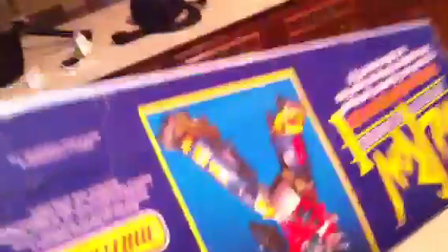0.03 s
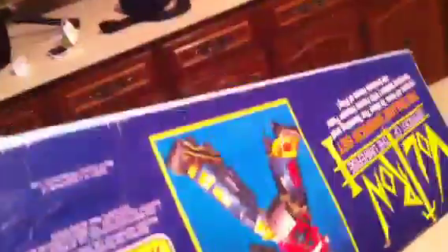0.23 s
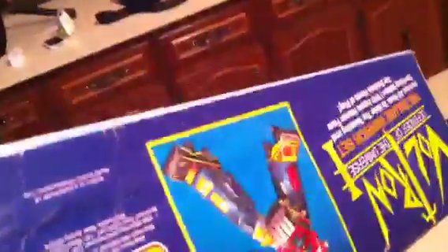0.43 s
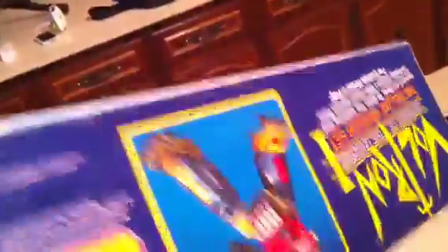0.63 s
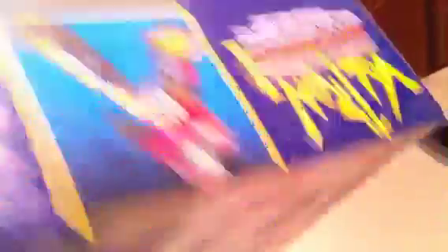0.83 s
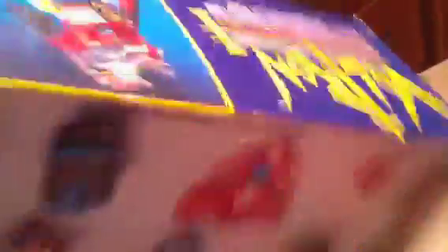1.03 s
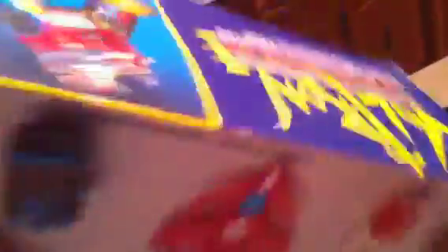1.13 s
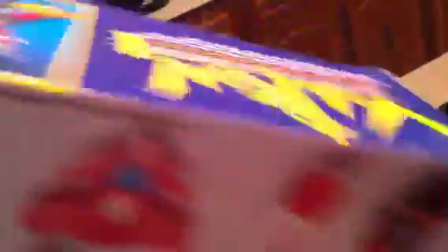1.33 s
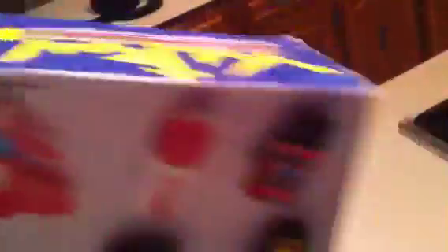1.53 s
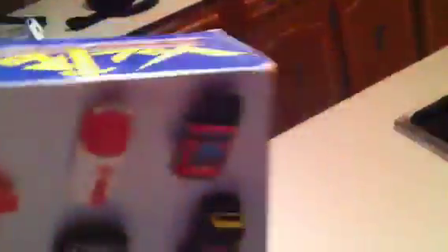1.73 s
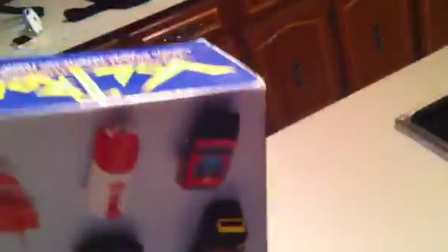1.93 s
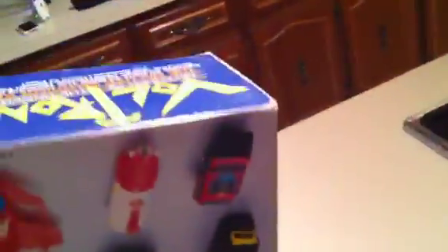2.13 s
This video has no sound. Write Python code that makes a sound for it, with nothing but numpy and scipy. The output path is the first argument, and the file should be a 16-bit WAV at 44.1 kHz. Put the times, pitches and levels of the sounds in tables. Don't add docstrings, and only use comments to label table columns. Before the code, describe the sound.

A hollow cardboard box is handled, with rubbing, scraping and dull knocks in a small room

```python
import sys
import numpy as np
from scipy import signal
from scipy.fft import rfft, irfft
from scipy.io import wavfile

SR = 44100
rng = np.random.default_rng(int(sys.argv[2]) if len(sys.argv) > 2 else 0)


def generate_wav(signal):
    frames = np.transpose(np.atleast_2d(signal))
    scaled = np.clip(frames, -1, 1) * 32767
    pcm = np.round(scaled).astype(np.int16)
    wavfile.write(sys.argv[1], SR, pcm)


def nominal_scale(level):
    x = np.asarray(level, float) / 20
    return 10 ** x


N = 97020


def rms_one(x):
    return x / np.sqrt(np.mean(x ** 2) + 1e-20)


def colour(x, points):
    hz, db = np.transpose(points)
    f = np.maximum(np.fft.rfftfreq(N, 1 / SR), 10)
    gain = nominal_scale(np.interp(np.log(f), np.log(hz), db))
    return rms_one(irfft(rfft(x) * gain, N))


def drift(rate_hz):
    r = np.exp(-2 * np.pi * rate_hz / SR)
    noise = rng.standard_normal(N + SR)
    return rms_one(signal.lfilter([1], [1, -2 * r, r * r], noise)[SR:])


def ring(x, hz, t60):
    r = nominal_scale(-60 / (t60 * SR))
    w = 2 * np.pi * hz / SR
    return signal.lfilter([0, np.sin(w)], [1, -2 * r * np.cos(w), r * r], x + 1e-18)


# f/Hz, level/dB per Hz
AIR_SPECTRUM = [(18, -86), (30, -95), (108, -33), (173, -2.5), (203, 4), (790, -16.5), (1200, -19),
                (1520, -24.5), (15600, -32)]
# f/Hz, bandwidth/Hz, level/dB
HUM_BANDS = [(220.3, 6.9, -68), (253.4, 41, -65), (130.3, 78, -67.5), (422, 21, -68)]


def background():
    air = nominal_scale(-58.5) * colour(rng.standard_normal(N), AIR_SPECTRUM)
    hum = 0
    for hz, width_hz, db in HUM_BANDS:
        hum = hum + nominal_scale(db) * rms_one(ring(rng.standard_normal(N), hz, 1.18 / width_hz))
    return air + hum


def room(x):
    t60_s, level_db, wall_cut_hz = 0.45, -11, 8400
    t = np.arange(SR // 2) / SR
    noise = rng.standard_normal(len(t))
    dull = signal.sosfilt(signal.butter(1, wall_cut_hz, fs=SR, output="sos"), noise)
    tail = dull * nominal_scale(-60 * t / t60_s) + 0.32 * noise * nominal_scale(-150 * t / t60_s)
    tail = tail * (t > .004)
    return nominal_scale(level_db) * signal.fftconvolve(x, tail / np.sqrt(np.sum(tail ** 2)))[:N]


# f/Hz, level/dB, t60/s
PANEL_MODES = [(142, -17, 0.087), (208.3, -7.5, 0.12), (259.2, -2.5, 0.04), (342.6, -1, 0.073),
               (401.5, -1.5, 0.053), (490.5, -0.5, 0.038), (534.4, -4.5, 0.076), (600, 1.5, 0.022),
               (682, 1.5, 0.017), (851, -8.5, 0.075), (913, -19, 0.095), (1036, -9.5, 0.014),
               (1410, -12.5, 0.027), (1760, -38, 0.013)]


def box(force):
    out = 0
    for k, (hz, db, t60) in enumerate(PANEL_MODES):
        out = out + nominal_scale(db) * ring(force, hz, t60) * (-1) ** k
    return out


# t/s, peak level/dB, struck panel f/Hz, tick level/dB
IMPACTS = [(0.2027, -52, 243, -46), (0.211, -26, 540, -44), (0.2137, -29, 610, -50),
           (0.218, -29.5, 164, -38), (0.2207, -28, 375, -48), (0.238, -38, 485, -60),
           (0.2945, -34, 350, -63), (0.309, -36, 330, -62), (.2185, -36, 1950, -50), (.219, -40, 3900, -60),
           (.243, -40, 3450, -62), (.248, -38, 3400, -60), (.256, -43, 2100, -60), (.265, -42, 3300, -62),
           (.338, -42, 3400, -60), (0.288, -38, 500, -41), (0.7336, -42, 2400, -47), (1.128, -36, 860, -62),
           (1.204, -32, 1140, -71), (1.2345, -37.5, 430, -69), (1.255, -37, 131, -59),
           (0.34, -43, 403, -49.5), (1.368, -63, 600, -50), (1.471, -48, 610, -55),
           (1.504, -31.5, 282, -42), (1.593, -69, 480, -60), (1.606, -38, 245, -69),
           (1.691, -55, 890, -50.5), (1.759, -44, 754, -66.5), (1.8749, -41, 545, -62),
           (1.877, -31, 247, -53.5), (1.92, -42, 895, -56), (1.985, -42.5, 520, -41.5),
           (2.0349, -40, 655, -46.5), (2.043, -64, 600, -65)]


def knocks():
    contact_cycles, spread_db_per_octave = .6, 15
    panel_db, panel_cycles = 2.0, 13.0
    tick_s, tick_rise_s = .005, .0007
    out = np.zeros(N)
    luck_db = rng.normal(0, 2.64, (len(IMPACTS), len(PANEL_MODES)))
    tick_band = signal.butter(2, [900, 3600], "band", fs=SR, output="sos")
    noise = 1.6 * signal.sosfilt(tick_band, rng.standard_normal(N))
    for (s, db, pitch_hz, tick_db), chance_db in zip(IMPACTS, luck_db):
        i = int(s * SR)
        t = np.arange(min(N - i, SR // 4)) / SR
        push = np.sin(np.pi * np.clip(t * pitch_hz / contact_cycles, 0, 1)) ** 2
        push = push / push.sum()
        thud = nominal_scale(panel_db) * ring(-push, pitch_hz, panel_cycles / pitch_hz)
        for (hz, mode_db, t60), c in zip(PANEL_MODES, chance_db):
            octaves = abs(np.log2(hz / pitch_hz))
            thud = thud + nominal_scale(1.1 * mode_db + c - spread_db_per_octave * octaves) * ring(-push, hz, 2.1 * t60)
        thud = signal.sosfilt(signal.butter(2, .45 * pitch_hz, "high", fs=SR, output="sos"), thud)
        tick = noise[i:i + len(t)] * np.exp(-t / tick_s) * np.tanh(t / tick_rise_s)
        out[i:i + len(t)] += nominal_scale(db - 8) * thud + nominal_scale(tick_db) * tick
    return out


def squeak(rows, face, wobble, flutter_db, tilt_db, count):
    s, hz, db = np.transpose(rows)
    face_hz, face_db = np.transpose(face)
    t = np.arange(N) / SR
    pitch = np.interp(t, s, hz) * (1 + wobble * drift(330))
    phase = 2 * np.pi * np.cumsum(pitch) / SR
    edge = np.clip(np.minimum(t - s[0], s[-1] - t) / 0.00088, 0, 1)
    tone = 0
    for k in range(1, count + 1):
        level_db = np.interp(k * pitch, face_hz, face_db) + tilt_db * (k - 1) + flutter_db * drift(190)
        tone = tone + nominal_scale(level_db) * np.sin(k * phase)
    return edge * nominal_scale(np.interp(t, s, db)) * tone


# t/s, slip rate f/Hz, level/dB
LOW_GLIDE = [
    (.089, 930, -64),
    (.1, 1010, -57),
    (.106, 1370, -59),
    (.112, 1450, -53),
    (.12, 1650, -53),
    (.126, 1420, -59),
    (.131, 1135, -58),
    (.141, 1100, -56),
    (.147, 1450, -62),
]
# t/s, slip rate f/Hz, level/dB
LOW_GLIDE_AGAIN = [
    (.141, 800, -64),
    (.145, 830, -54),
    (.15, 925, -53),
    (.155, 830, -58),
    (.159, 935, -52),
    (.164, 1075, -54),
    (.169, 1050, -66),
]
# f/Hz, level/dB
LOW_FACE = [(1100, -11), (1300, -5), (1700, 0), (2300, -8), (2950, 1), (3400, -2), (3800, -7), (6600, -10)]


def low_squeaks():
    return sum(squeak(rows, LOW_FACE, wobble=.014, flutter_db=3.5, tilt_db=-.8, count=6)
               for rows in (LOW_GLIDE, LOW_GLIDE_AGAIN))


# t/s, slip rate f/Hz, level/dB
HIGH_GLIDE = [
    (1.389, 3250, -70),
    (1.396, 3794, -50),
    (1.403, 4340, -54),
    (1.412, 4700, -54),
    (1.429, 4750, -56),
    (1.435, 5140, -44),
    (1.443, 6070, -44),
    (1.449, 7100, -48),
    (1.453, 7700, -56),
]
# t/s, slip rate f/Hz, level/dB
HIGH_LINGER = [
    (1.43, 4740, -60),
    (1.446, 4760, -62),
    (1.485, 4880, -61),
    (1.505, 4950, -67),
]
# f/Hz, level/dB
HIGH_FACE = [(7400, 0), (8000, -8), (8800, -10), (9450, 13), (11500, 6), (13000, 5), (14250, 11),
             (14900, -20)]


def high_squeaks():
    glide = squeak(HIGH_GLIDE, HIGH_FACE, wobble=.011, flutter_db=2.5, tilt_db=-11, count=3)
    linger = squeak(HIGH_LINGER, HIGH_FACE, wobble=.006, flutter_db=2.5, tilt_db=-9, count=1)
    return glide + linger


def grains(rate_per_s):
    sizes = nominal_scale(2.76 * np.minimum(rng.exponential(1, N), 5)) * rng.choice([-1, 1], N)
    happens = rng.random(N) < rate_per_s / SR
    return rms_one(sizes * happens * nominal_scale(1.22 * drift(66)))


# start t/s, length t/s, box rumble level/dB, scrape level/dB, skin hiss level/dB
FINGER_STROKES = [(0, 0.029, -57, -55.5, -70), (0.21, 0.022, -39.5, -42.5, -54),
                  (0.229, 0.059, -45, -52, -65), (0.269, 0.065, -52, -49.5, -73),
                  (0.329, 0.083, -64, -58, -76), (0.891, 0.12, -54.5, -64, -70),
                  (0.979, 0.18, -53, -60, -66.5), (1.085, 0.055, -49.5, -56, -73),
                  (1.115, 0.0069, -56, -49, -59), (1.122, 0.015, -47, -49.5, -58.5),
                  (1.129, 0.049, -46.5, -54.5, -78), (1.156, .012, -54, -52, -63),
                  (1.176, .004, -60, -62, -62), (1.188, .004, -60, -63, -64), (1.203, .007, -55, -54, -58),
                  (1.2345, .009, -46, -51, -54), (1.243, .016, -48, -51, -57), (1.288, .012, -52, -59, -58),
                  (1.298, 0.012, -44.5, -54, -71), (1.376, 0.031, -70, -71, -60),
                  (1.47, 0.064, -44.5, -47.5, -58), (1.497, .032, -43, -48, -55),
                  (1.53, .055, -49, -52, -60), (1.588, .045, -47, -54, -63), (1.59, .01, -60, -57, -54),
                  (1.872, .018, -50, -56, -55), (1.913, .03, -57, -60, -62), (1.983, .034, -52, -51, -50),
                  (2.021, 0.027, -61, -61, -64), (2.162, 0.045, -83, -63, -77)]
# start t/s, length t/s, box rumble level/dB, scrape level/dB, skin hiss level/dB
FINGER_SLIDES = [
    (.087, .08, -64, -62, -61),
    (.165, .04, -66, -66, -72),
    (1.936, .026, -55, -57, -61),
    (1.962, .022, -56, -60, -62),
    (1.738, .048, -57, -62, -70),
    (1.4, .07, -56, -60, -60),
    (1.517, .005, -60, -58, -51),
    (.915, .004, -62, -62, -64),
]


def stroke_gain(column):
    rise_share, tail_db, slide_edge_s = .18, -12, .003
    t, power = np.arange(N) / SR, 0
    for row in FINGER_STROKES:
        u = (t - row[0]) / row[1]
        rise = np.clip(u / rise_share, 0, 1)
        fall = nominal_scale(tail_db * np.clip(u, 0, 2) ** 2) * np.clip(4 - 3 * u, 0, 1)
        power = power + (nominal_scale(row[column]) * rise * fall) ** 2
    for row in FINGER_SLIDES:
        to_edge = np.minimum(t - row[0], (row[0] + row[1] - t) / 2 + slide_edge_s)
        power = power + (nominal_scale(row[column]) * np.clip(to_edge / slide_edge_s, 0, 1)) ** 2
    return np.sqrt(power)


# t/s, level/dB
COUNTER_DRAG = [(0.0, -51.5), (0.23, -63.5), (0.37, -71), (0.54, -67.5), (0.81, -60), (0.97, -63),
                (1.12, -60), (1.4, -53), (1.67, -56), (1.94, -60), (2.09, -53.5), (2.2, -83)]
# from t/s, to t/s, f/Hz, t60/s, level/dB
LOOSE_PANEL = (.9, 1.33, 398, .13, -1.0)
# f/Hz, t60/s, level/dB
FACE_MODES = [(1990, 0.0066, 10.5), (3070, 0.0051, -4), (3180, 0.009, -3.5)]
# f/Hz, level/dB per Hz
SCRAPE_SPECTRUM = [(120, -32), (350, -24), (800, 5.5), (1300, 0), (2200, -1.5), (3500, -7), (6000, -16),
                   (15000, -29.5)]
# f/Hz, level/dB per Hz
HISS_SPECTRUM = [(500, -34), (1800, -1), (3500, -4), (5500, 0), (8200, -5), (11800, 2), (14000, -6.5),
                 (16000, -7)]


def rubbing():
    t = np.arange(N) / SR
    s, db = np.transpose(COUNTER_DRAG)
    drag = nominal_scale(np.interp(t, s, db))

    slips = grains(2000)
    box_level = np.sqrt(np.mean(box(slips) ** 2))
    force = slips * np.hypot(stroke_gain(column=2), nominal_scale(-13.0) * drag)
    start, end, hz, t60, loose_db = LOOSE_PANEL
    boom = nominal_scale(loose_db) * ring(force * (t > start) * (t < end), hz, t60)
    rumble = (box(force) + boom) / box_level

    fine = grains(9000)
    sheet = rms_one(sum(nominal_scale(d) * ring(fine, f, decay) for f, decay, d in FACE_MODES))
    scrape = colour(fine, SCRAPE_SPECTRUM) + nominal_scale(-17.5) * sheet
    scrape = scrape * np.hypot(stroke_gain(column=3), nominal_scale(-9.5) * drag)

    hiss = colour(fine + 3.3 * rng.standard_normal(N), HISS_SPECTRUM)
    hiss = hiss * np.hypot(stroke_gain(column=4), nominal_scale(-18.0) * drag)
    return rumble + scrape + hiss


def scene():
    near = rubbing() + knocks() + low_squeaks() + high_squeaks()
    return (near + room(near) + background())[None]


def roll_off(x):
    return signal.sosfilt(signal.butter(12, 15740, fs=SR, output="sos"), x)


def record(dry):
    x = signal.sosfilt(signal.butter(3, 135, "high", fs=SR, output="sos"), dry)
    x = signal.sosfilt(signal.ellip(10, .5, 60, 15760, fs=SR, output="sos"), x)
    return roll_off(x)


dry = scene()
out = record(dry)
generate_wav(out)
```